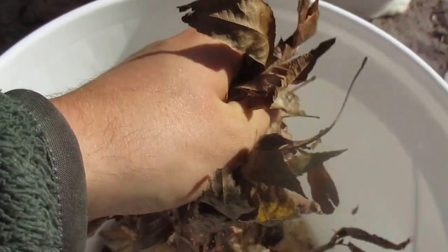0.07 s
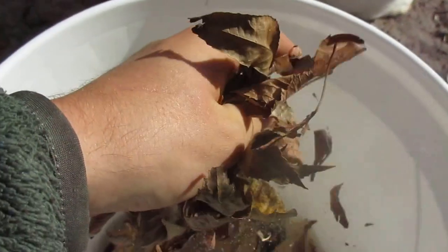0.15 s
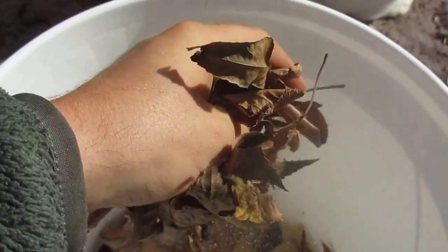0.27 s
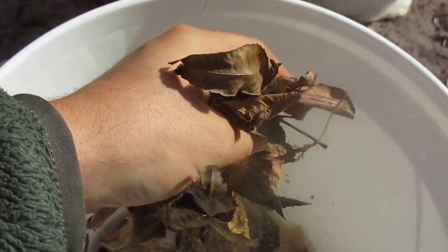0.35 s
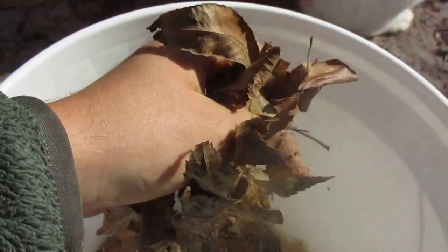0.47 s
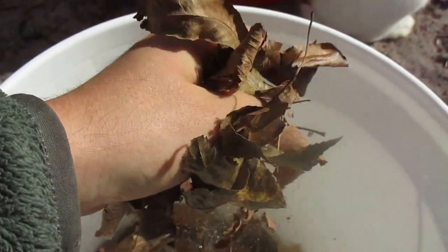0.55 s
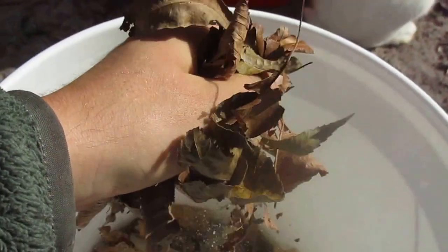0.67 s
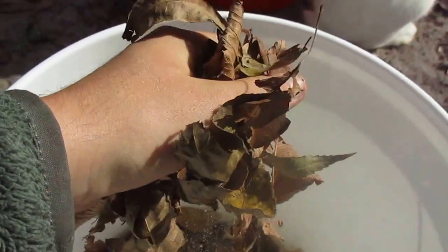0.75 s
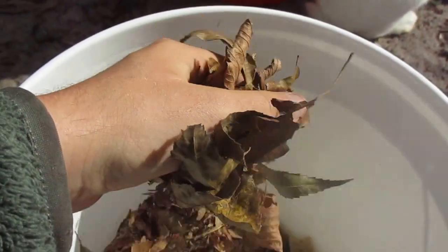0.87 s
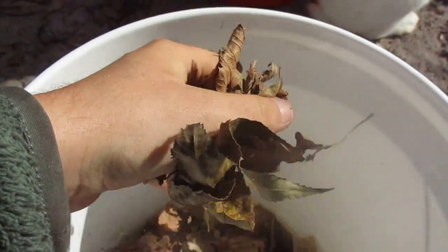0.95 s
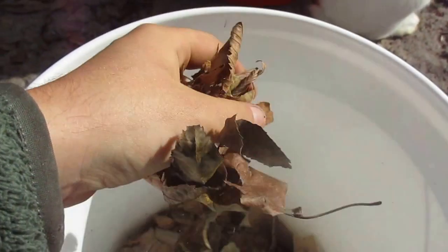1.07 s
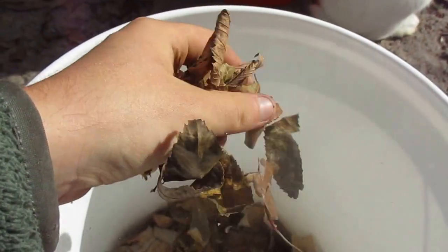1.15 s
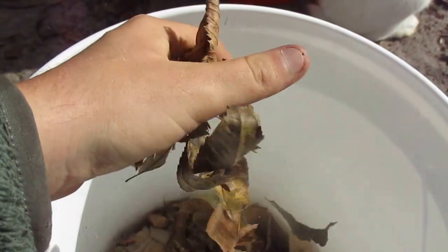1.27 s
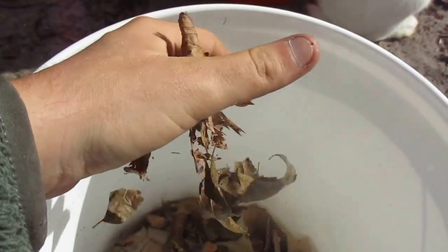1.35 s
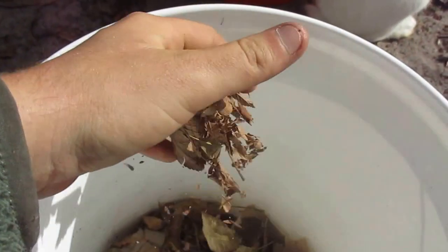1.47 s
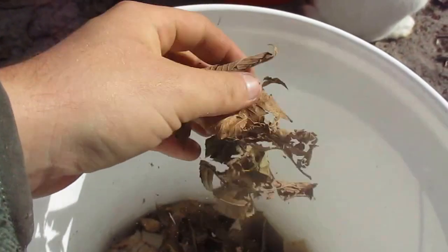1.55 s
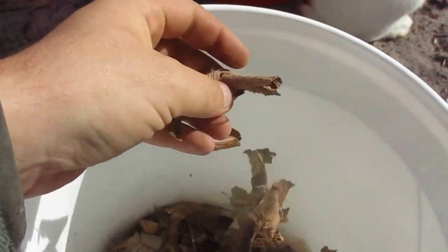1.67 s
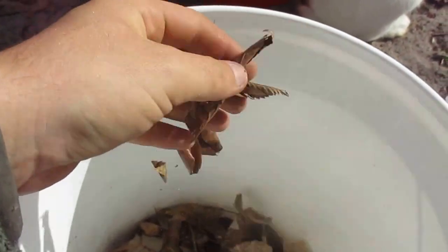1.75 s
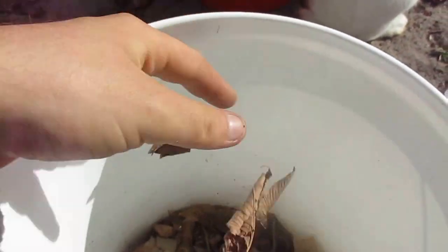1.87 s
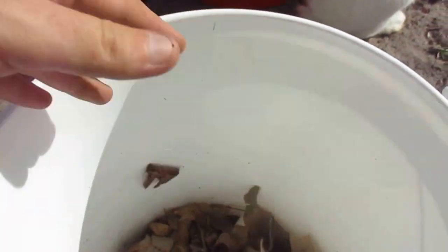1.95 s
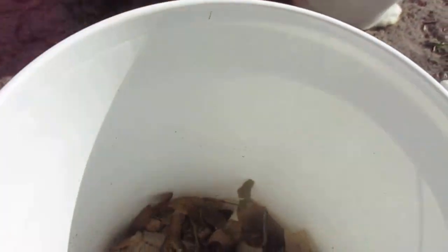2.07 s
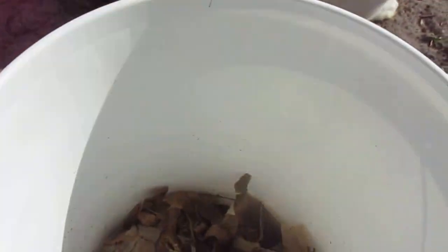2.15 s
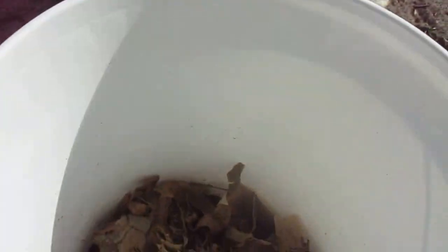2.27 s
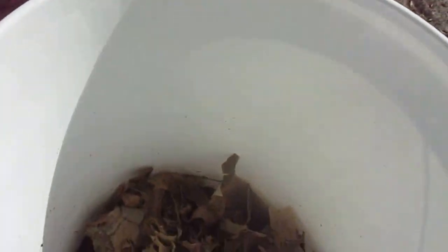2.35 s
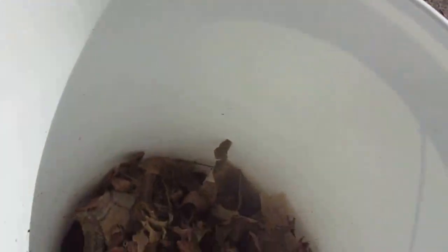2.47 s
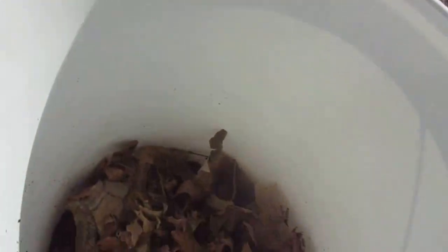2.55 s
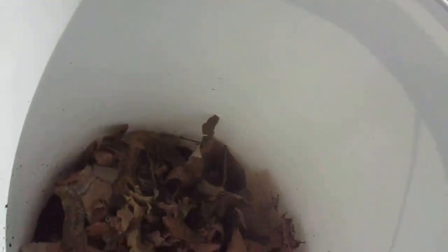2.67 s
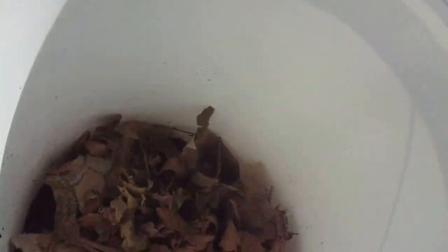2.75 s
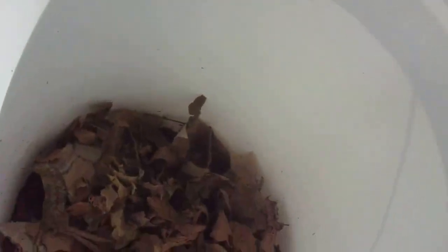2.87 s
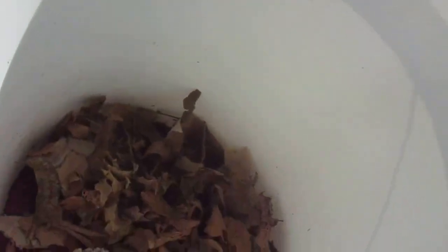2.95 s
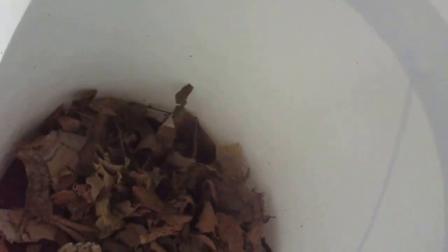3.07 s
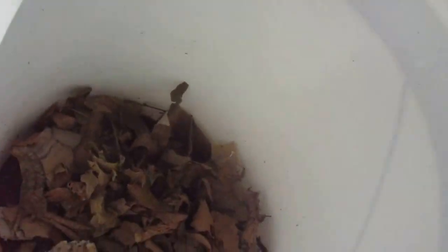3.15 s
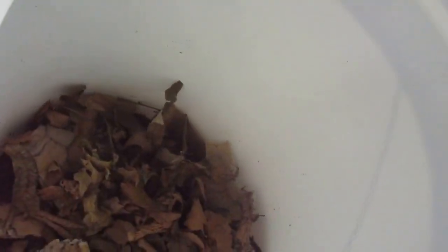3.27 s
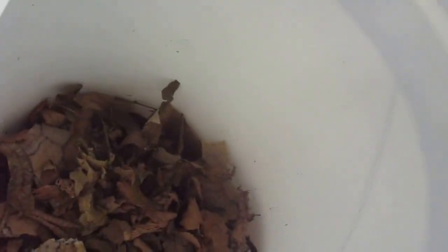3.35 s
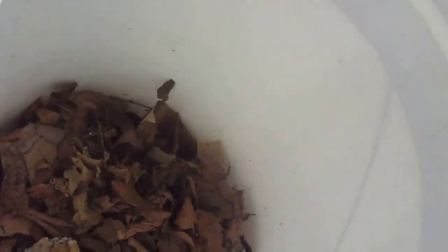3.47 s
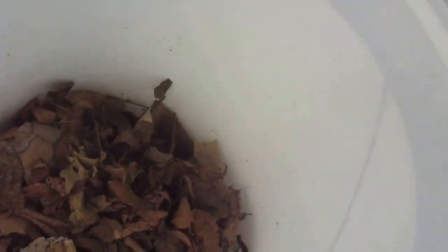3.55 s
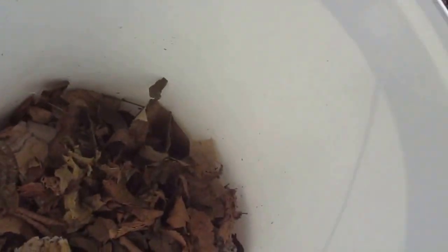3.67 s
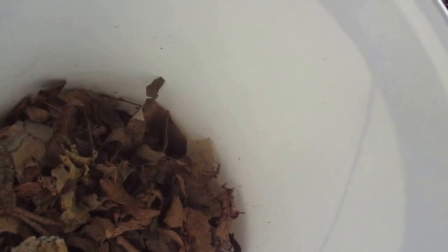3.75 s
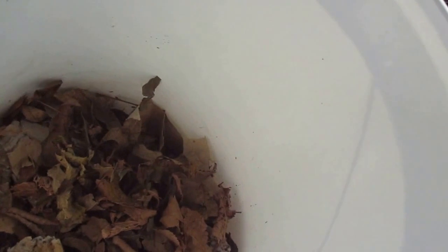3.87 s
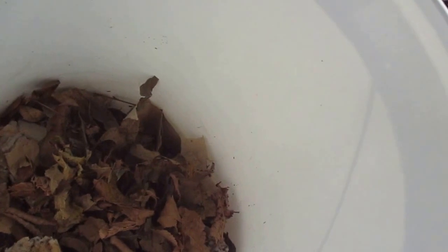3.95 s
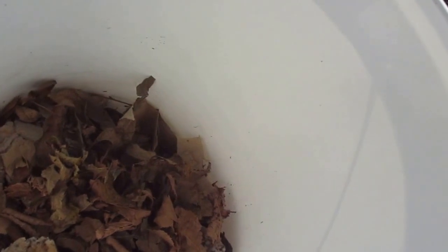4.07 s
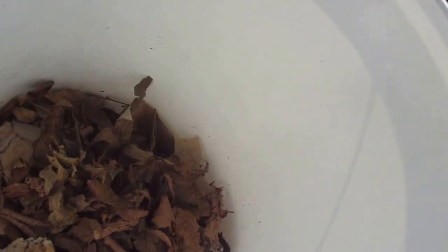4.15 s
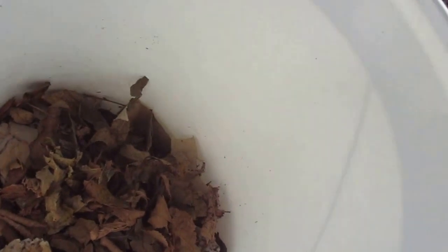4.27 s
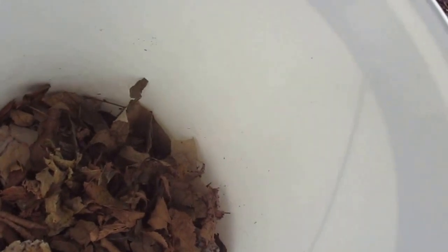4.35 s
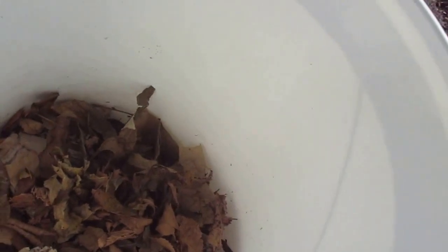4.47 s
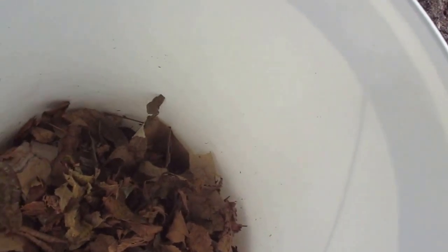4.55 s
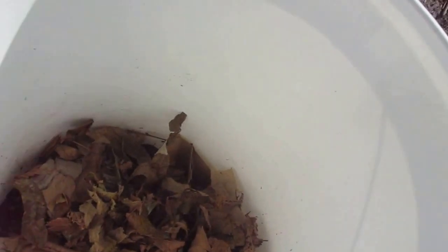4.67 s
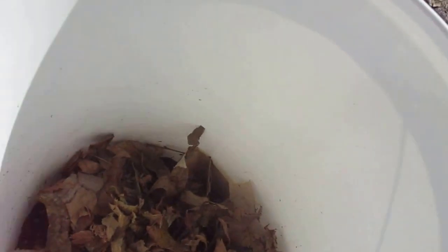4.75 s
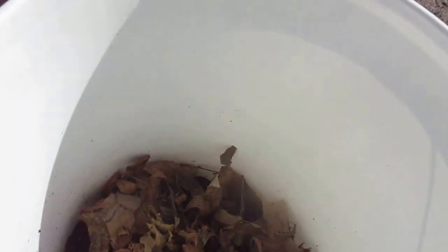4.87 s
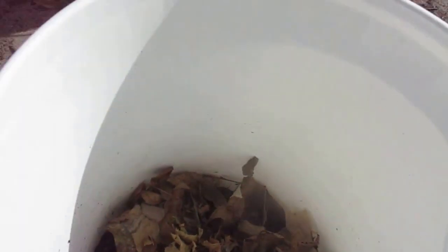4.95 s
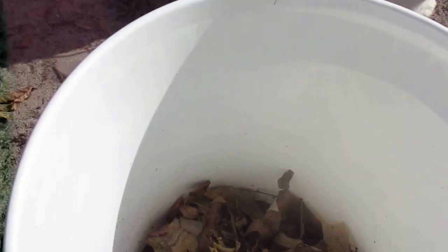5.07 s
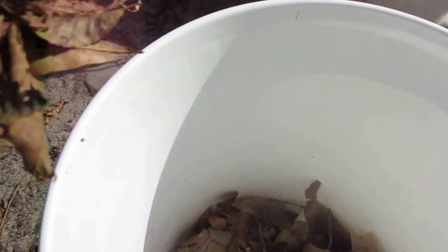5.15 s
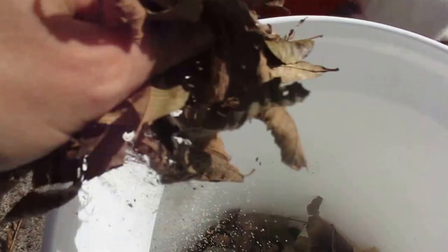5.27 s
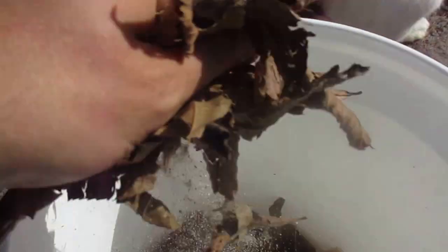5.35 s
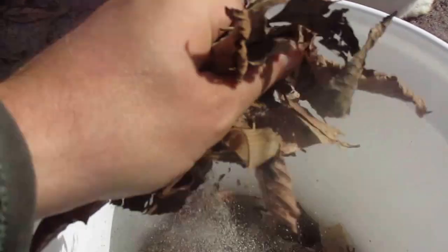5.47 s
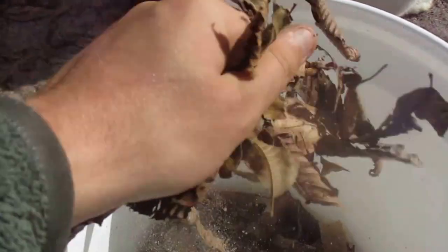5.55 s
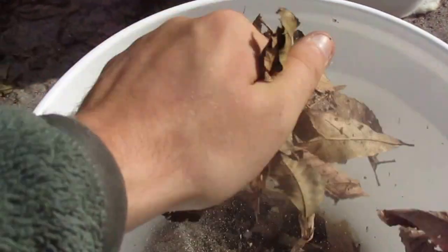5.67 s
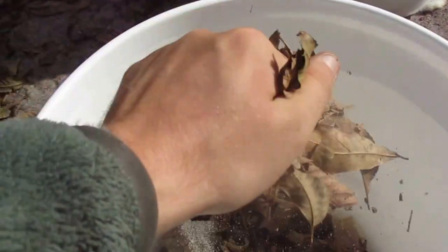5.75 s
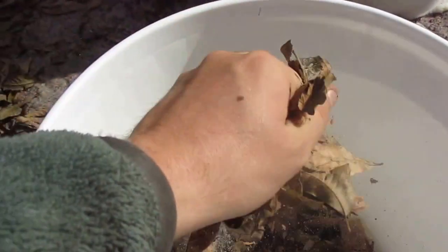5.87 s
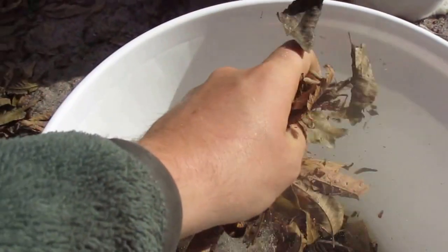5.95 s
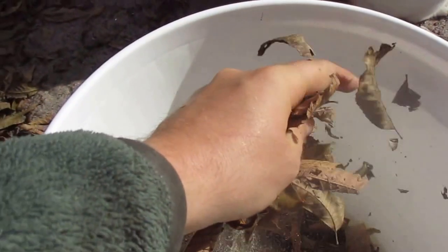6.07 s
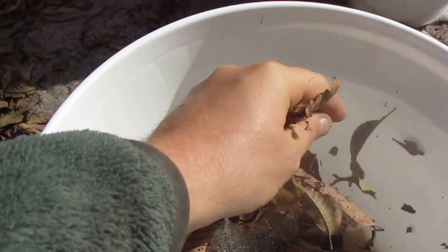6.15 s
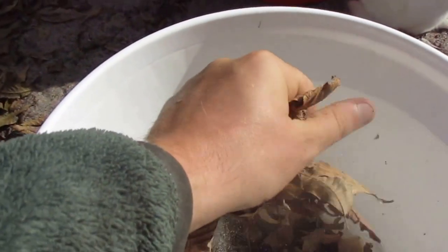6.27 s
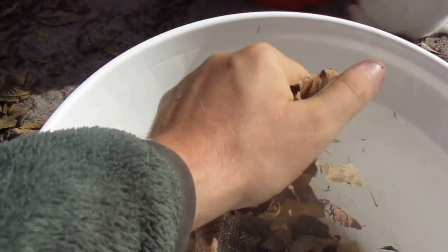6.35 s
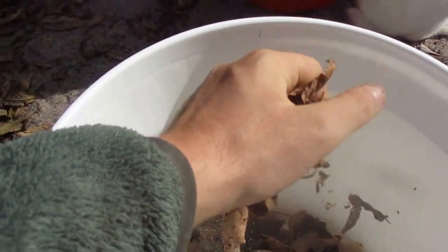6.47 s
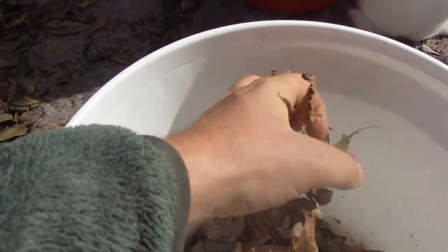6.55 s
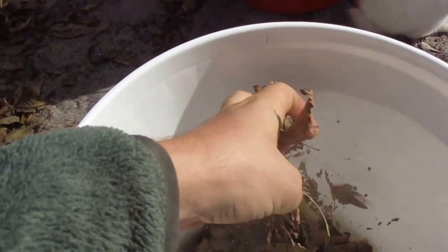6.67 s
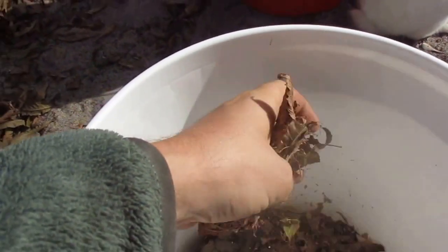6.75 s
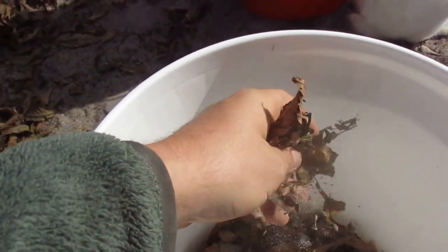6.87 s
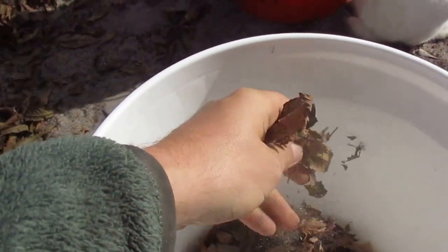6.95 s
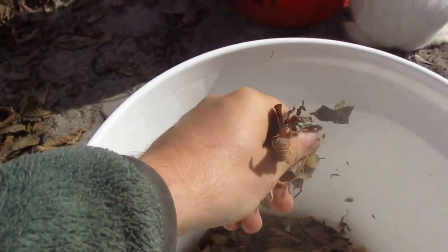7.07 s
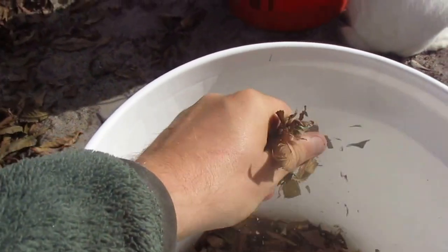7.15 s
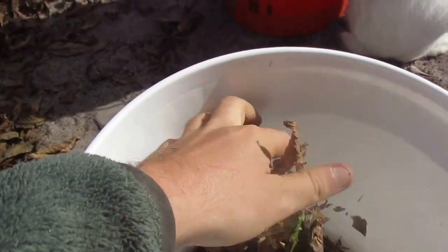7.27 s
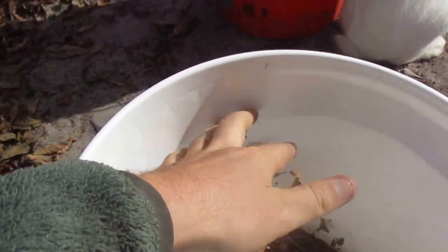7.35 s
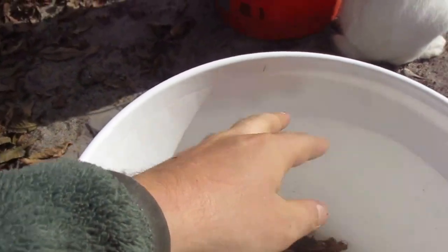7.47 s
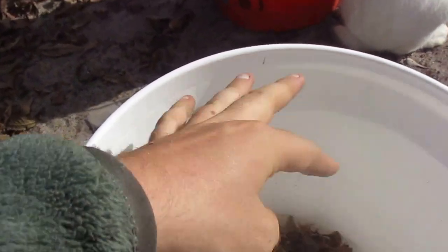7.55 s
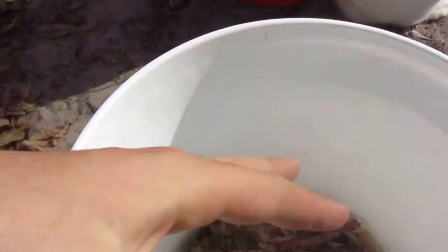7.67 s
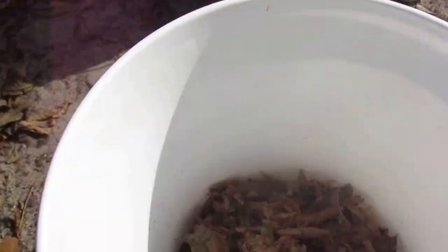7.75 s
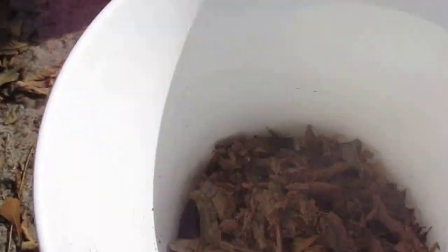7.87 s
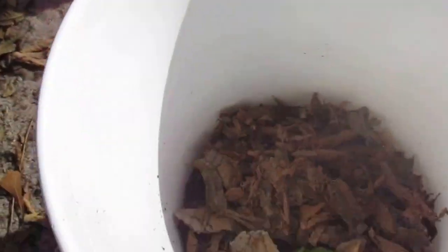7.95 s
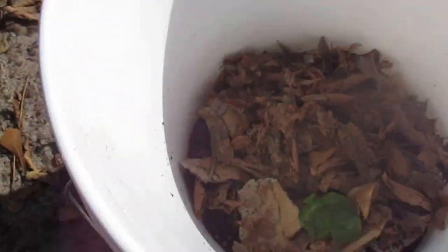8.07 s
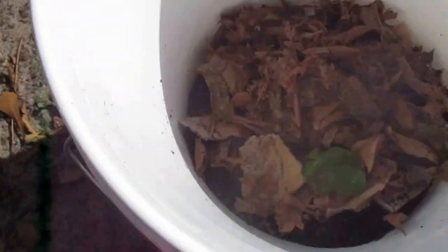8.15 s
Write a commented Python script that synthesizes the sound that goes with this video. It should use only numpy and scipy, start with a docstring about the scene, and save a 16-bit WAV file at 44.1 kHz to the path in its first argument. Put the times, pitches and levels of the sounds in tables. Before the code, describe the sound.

Close outdoor pickup. From the start a hand crunches dry leaves over a plastic bucket: crisp, bright crackling, strongest at once and around 1 s, with tiny snaps and a faint hollow bucket tone. From 1.3 to 2.1 s it breaks into sparse crunches, ticks and light knocks. Near quiet follows, with only soft rustle, low outdoor rumble and hollow murmur. From about 2.8 s leaves are raked in swelling, duller sweeps, loud near 3.3 s, lighter around 3.6, then rasping and snapping from 3.9 to 5 s, with a woody crack and soft bump near 4.8. At 5.2 to 5.6 s comes the densest, loudest crushing. Separate crunches continue to 7.5 s, thinning out, with small cracks and a prominent hollow knock at 7.3. A soft, low sleeve-like rustle and slight wind rumble end it by 8.1 s.

```python
"""A hand crunches a fistful of dry leaves over a plastic bucket outdoors, as filtered bursts of tiny fractures.
Clumps land in it, more leaves are raked from the ground in swelling, duller sweeps and crunched in their turn,
and it ends on a soft, low rustle of sleeve or handling. Ribs snap as short ringing ticks and surfaces rasp in
uneven slips; random echoes place grains in the bucket. Knocks, woody cracks and soft bumps ring a bank of modes.
Throughout, filtered noise makes outdoor rumble, a hollow murmur in the bucket and puffs of wind on the microphone."""
import sys
import numpy as np
from scipy import signal
from scipy.fft import rfft, irfft
from scipy.io import wavfile
from scipy.ndimage import uniform_filter1d

SR = 44100
rng = np.random.default_rng(int(sys.argv[2]) if len(sys.argv) > 2 else 0)


def to_wav(s):
    """Save 16-bit WAV."""
    ch = np.atleast_2d(s).T  # columns
    pcm = np.round(np.clip(ch, -1, 1) * 32767)  # PCM
    wavfile.write(sys.argv[1], SR, pcm.astype(np.int16))


N = 361566
TIME = np.arange(N) / SR

# sweeps through ground leaves, and faint rustles of clothing or handling at the end: start_s [s], length_s [s],
# crackle level_db at the end [dB], dull_db of the rustle against the crackle before its trim [dB],
# swell_db from start to end [dB]
SWEEPS_AND_RUSTLES = [(2.187, 0.42, -61, 8, 6), (2.745, 0.13, -46, 4.5, 6.5), (2.82, .23, -35.5, 0, 5.5),
                      (3.04, 0.29, -24, -2, 18.5), (3.393, .16, -34, -6, 13), (3.573, 0.061, -35.5, -4, 8),
                      (3.653, 0.12, -46.5, -6, -0.5), (3.852, 0.078, -30, -1.5, 11.5),
                      (3.906, 0.25, -24.5, -4.5, 6), (4.138, 0.2, -31.5, -2, -1.5),
                      (4.307, 0.22, -22.5, -4, 2.5), (4.534, .17, -27, -7, -4.5),
                      (4.723, 0.054, -25, -14, -5), (4.8, 0.17, -28.5, -8.5, 1), (4.96, 0.224, -28, -17, 2),
                      (7.613, 0.6, -58, 8, -5.5), (8.044, 0.044, -51, 12.5, -5)]
CATCH_S = 0.032  # time each of them takes to fade in


def from_db(db):
    """Turns decibels into an amplitude factor."""
    return 10 ** (np.asarray(db) / 20)


def unit(x):
    """Scales to rms 1."""
    return x / np.sqrt(np.mean(x ** 2) + 1e-20)


def level(rows, column):
    """Gain over time, drawn between the points of one dB column."""
    rows = np.asarray(rows)
    return from_db(np.interp(TIME, rows[:, 0], rows[:, column]))


def add(mix, start_s, sound):
    """Mixes a sound in from its start time, trimming whatever falls outside."""
    start = round(start_s * SR)
    sound = sound[max(-start, 0):]
    part = mix[max(start, 0):][:len(sound)]
    part += sound[:len(part)]


def colour(x, points, peaks=(), size=4096):
    """Minimum-phase filter with a given spectrum and resonances, so that clicks keep sharp fronts."""
    hz = abs(np.fft.fftfreq(size, 1 / SR))
    point_hz, point_db = np.transpose(points)
    db = np.interp(np.log(hz + 1), np.log(point_hz), point_db)
    for peak_hz, width_hz, lift_db in peaks:
        db = db + lift_db / (1 + (2 * (hz - peak_hz) / width_hz) ** 2)
    # the Hilbert transform of the log spectrum supplies the phase
    log_spectrum = np.conj(signal.hilbert(np.log(from_db(db))))
    impulse = np.fft.ifft(np.exp(log_spectrum)).real
    return signal.oaconvolve(x, impulse)[:len(x)]


def wander(rate_hz):
    """Smooth chance of rms 1: noise that falls away above the given rate."""
    hz = np.fft.rfftfreq(N, 1 / SR)
    spectrum = rfft(rng.standard_normal(N)) / np.sqrt(1 + (hz / rate_hz) ** 4)
    return unit(irfft(spectrum, N))


def steadied(x, span_s):
    """Divides out the running rms, so that a sound's strength is set from outside."""
    power = abs(uniform_filter1d(x ** 2, int(span_s * SR) + 1))
    return x / np.sqrt(power + 1e-9)


def strength(dull=False):
    """Strength over time of the crisp crackle, or of the dull rustle: all the gestures add in power."""
    # the fist crunches leaves over the bucket, and clumps of leaves land in it: start_s [s], hold_s [s],
    # crackle level_db at full onset [dB], dull_db of the rustle against the crackle before its trim [dB]
    crunches = [(-.02, .07, -27, -10), (0.088, 0.05, -32.5, -9), (0.178, 0.12, -31, -11),
                (0.336, 0.39, -37, -10), (0.531, 0.12, -34.5, -9.5), (0.725, 0.34, -37.5, -12),
                (0.986, 0.04, -26.5, -9.5), (1.065, 0.19, -32, -13.5), (1.336, 0.1, -39, -12.5),
                (1.503, 0.016, -35.5, -8.5), (1.543, 0.016, -28, -11), (1.61, 0.12, -42, -13),
                (1.743, 0.06, -30.5, -7.5), (1.86, 0.14, -49.5, -1), (1.984, 0.036, -34.5, -2.5),
                (2.127, 0.014, -47, 0), (5.187, 0.11, -23.5, -17), (5.293, 0.077, -20.5, -15),
                (5.408, 0.14, -23, -14.5), (5.498, 0.14, -23, -16), (5.686, .1, -35, -22),
                (5.778, 0.14, -29, -10), (5.879, 0.54, -27.5, -18), (6.147, 0.21, -26, -11),
                (6.409, 0.082, -35.5, -19), (6.48, 0.024, -26.5, -8), (6.577, 0.042, -36, -4),
                (6.646, 0.064, -28, -11.5), (6.742, 0.079, -26.5, -8), (6.85, 0.24, -31, -12.5),
                (7.014, 0.028, -26, -11.5), (7.126, 0.079, -31.5, -11), (7.266, 0.027, -40.5, -17),
                (7.365, 0.086, -27.5, -7), (7.494, 0.14, -42, -6)]
    # each starts quickly, eases off, then lets go
    grip_s, ease_db_per_s, let_go_db_per_s = 0.017, 10.5, 189
    settle_db_per_s = 297  # how fast a sweep or rustle dies after its end
    t = TIME[::64]
    power = np.full(len(t), 1e-9)
    for start_s, hold_s, db, dull_db in crunches:
        held_s = t - start_s - grip_s
        ease_db = ease_db_per_s * np.clip(held_s, 0, hold_s)
        release_db = let_go_db_per_s * np.maximum(held_s - hold_s, 0)
        attack = np.clip((t - start_s) / grip_s, 0, 1)
        power += (attack * from_db(db + dull * dull_db - ease_db - release_db)) ** 2
    for start_s, length_s, db, dull_db, swell_db in SWEEPS_AND_RUSTLES:
        passed_s = t - start_s
        # a positive swell rises to the end level, a negative one falls to it
        below_end_db = swell_db * np.clip(1 - passed_s / length_s, 0, 1)
        release_db = settle_db_per_s * np.maximum(passed_s - length_s, 0)
        attack = np.clip(passed_s / CATCH_S, 0, 1)
        power += (attack * from_db(db + dull * dull_db - below_end_db - release_db)) ** 2
    return np.interp(TIME, t, np.sqrt(power))


def outside_bucket():
    """Share of the drier colour outside the bucket, 0-1: it rises around each ground sweep or closing rustle."""
    outside = np.zeros(N)
    for start_s, length_s, *_ in SWEEPS_AND_RUSTLES:
        outside[(TIME > start_s - CATCH_S) & (TIME < start_s + length_s + CATCH_S)] = 1
    return uniform_filter1d(outside, size=2048)


def walls(sound, wet_db=-8, t60=.045):
    """Quick echoes between the bucket's walls, as decaying random taps drawn afresh for each call."""
    t = np.arange(1536) / SR
    signs = rng.choice([-1, 1], len(t))
    present = (rng.random(len(t)) < .2) * (t > .0008)
    echoes = signs * present * from_db(-60 * t / t60)
    return signal.fftconvolve(sound, (t == 0) + from_db(wet_db) * echoes / np.linalg.norm(echoes))


def fractures(per_s, spread_db, clump_db, low_hz, high_hz, cycles, shift_db, count=40):
    """Clumps of tiny breaks; each rings one scrap of leaf briefly, and the scraps take turns."""
    size = from_db(spread_db * np.minimum(rng.exponential(1, N), 3.2))
    breaking = rng.random(N) < per_s / SR
    clicks = size * rng.choice([-1, 1], N) * breaking * from_db(clump_db * wander(100))
    scrap = rng.integers(0, count, N)
    t, out = np.arange(256) / SR, np.zeros(N)
    turns = np.arange(0, TIME[-1], .02)
    for k, hz in enumerate(np.linspace(low_hz, high_hz, count)):
        ring = walls(np.exp(-t * hz / cycles) * np.cos(2 * np.pi * hz * t))
        strain_db = shift_db * np.interp(TIME, turns, rng.standard_normal(len(turns)))
        out += signal.oaconvolve(clicks * (scrap == k) * from_db(strain_db), unit(ring))[:N]
    return unit(out)


def crackle(shade_hz=11500):
    """Brittle blades break over a fine hiss of rubbing; outside the bucket they sound duller."""
    # crisp spectrum: pitch_hz [Hz], relative level_db [dB per Hz]
    crisp = [(200, -22.5), (700, -13), (1800, -12), (2700, -8), (3600, -5), (4900, -1), (6500, -1),
             (8500, -1), (11000, -2.5), (14000, -6), (16000, -11.5)]
    # more strength breaks more at once, so loud crunches are dense and quiet ones patter
    per_s = 5200 * np.sqrt(strength() / from_db(-30))
    breaks = fractures(per_s, spread_db=4.5, clump_db=2.5, low_hz=1500, high_hz=15500, cycles=2.2, shift_db=2.5)
    rubbing = from_db(-10) * rng.standard_normal(N)
    near = unit(colour(steadied(breaks, 0.204) + rubbing, crisp))
    shaded = signal.filtfilt(*signal.butter(1, shade_hz, fs=SR), near)
    sound = near + .5 * outside_bucket() * (shaded - near)
    return strength() * steadied(sound, 0.033)


def rustle():
    """Soft brushes and ticks: hollow in the bucket, broader and drier outside it."""
    # spectra in and outside the bucket: pitch_hz [Hz], relative level_db [dB per Hz]
    dull_spectrum = [(60, -50), (200, 14), (500, -4.5), (700, 12), (1100, 3.5), (1400, 0.5), (2100, 0.5),
                     (2800, -4.5), (4200, 4.5), (9000, -45)]
    dry_spectrum = [(60, -21), (200, 2), (450, -2.5), (700, -4.5), (1000, -2.5), (1300, 1), (1700, -2.5),
                    (2050, -0.5), (2800, -1), (4200, -5), (9000, -18)]
    # air resonances in the bucket: pitch_hz [Hz], width_hz [Hz], lift_db [dB]
    cavity = [(664, 58, -6), (890, 600, -2.5), (1250, 120, 1), (1494, 77, 5.5), (2080, 200, 1.5)]
    brushes = fractures(per_s=1500, spread_db=3.5, clump_db=0.5, low_hz=406, high_hz=4650, cycles=0.5, shift_db=-2.0)
    ticks = fractures(per_s=500, spread_db=4.5, clump_db=2, low_hz=600, high_hz=3200, cycles=6, shift_db=2)
    grains = brushes + .6 * ticks
    inside = unit(colour(grains, dull_spectrum, cavity))
    outside = unit(colour(grains, dry_spectrum))
    share = outside_bucket()
    sound = (1 - share) * inside + share * outside
    return strength(dull=True) * from_db(-2.5) * steadied(sound, 0.077)


def ribs():
    """Chance snaps that follow the crackle's strength: start_s, level_db before the snap trim, pitch_hz."""
    per_s, over_crackle_db, spread_db = 16, 5, 0.5
    middle_hz, spread_octaves = 7500, 0.594
    at = np.flatnonzero(rng.random(N) < per_s / SR)
    size, pitch = rng.standard_normal((2, N))[:, at]
    db = 20 * np.log10(strength()[at]) + over_crackle_db + spread_db * np.minimum(size, 2)
    hz = np.minimum(middle_hz * 2 ** (spread_octaves * pitch), SR / 4)
    return list(zip(TIME[at], db, hz))


def snaps(splinter_db=-6, splinter_cycles=6, tear_db=-6):
    """A rib tears with a sharp tick, rings for about two cycles and sheds splinters, longer at low pitch."""
    # the placed stems and ribs: start_s [s], level_db as energy over 1 ms before trim and echoes [dB], pitch_hz [Hz]
    large_snaps = [(0.214, -25.5, 2800), (0.2706, -19, 5800), (0.6543, -22, 4700), (0.7807, -21, 7500),
                   (0.8717, -22.5, 9000), (1.1092, -18.5, 6800), (1.1485, -23, 5350), (1.403, -24, 6400),
                   (1.4206, -24, 3040), (1.5214, -33, 6100), (1.5323, -21, 10300), (1.5715, -12.5, 7650),
                   (1.682, -21.5, 11000), (1.7594, -18.5, 6000), (1.7763, -17, 6300), (1.8215, -21, 11000),
                   (1.8509, -24, 3970), (1.9713, -19.5, 6500), (2.006, -19.5, 6000), (2.0608, -23, 8400),
                   (2.8892, -25, 1780), (3.2724, -15, 7100), (3.3297, -11, 5900), (3.3506, -8, 7500),
                   (4.1806, -9.5, 5940), (4.3495, -10.5, 7800), (4.515, -16, 3760), (4.6995, -12, 3300),
                   (4.7508, -11.5, 5800), (4.755, -20, 3670), (4.7748, -16, 3700), (4.7832, -14, 2180),
                   (4.8205, -15.5, 2370), (4.85, -21, 2300), (4.8896, -12.5, 5800), (4.898, -14, 3000),
                   (4.9084, -26, 2800), (4.914, -18, 2400), (4.9208, -13, 4400), (4.9577, -20.5, 2800),
                   (5.1462, -18, 6900), (5.19, -9.5, 4440), (5.211, -15, 4700), (5.272, -12.5, 3950),
                   (5.3312, -17, 6600), (5.3661, -11, 4770), (5.37, -9.5, 6040), (5.4026, -12.5, 8000),
                   (5.4736, -10.5, 3930), (6.363, -14.5, 6500), (6.4972, -18.5, 4300),
                   (6.6234, -20.5, 5200), (6.677, -16, 7800), (6.7494, -17, 7000), (7.037, -26, 7100),
                   (7.381, -27, 6000), (7.4525, -13.5, 6550), (7.8877, -30, 4870), (8.053, -27, 3320)]
    out, t, millisecond = np.zeros(N), np.arange(512) / SR, SR // 1000
    thin = signal.butter(2, [1300, 14500], "band", fs=SR)
    tear = unit(np.diff(1. * (t == 0), prepend=0))
    for start_s, db, hz in large_snaps + ribs():
        ring = np.exp(-t * hz / 2) * np.cos(2 * np.pi * hz * t)
        band = signal.butter(1, [hz / 2, min(hz * 2, SR / 3)], "band", fs=SR)
        spray = signal.lfilter(*band, np.exp(-t * hz / splinter_cycles) * rng.standard_normal(len(t)))
        snap = unit(ring) + from_db(splinter_db) * unit(spray) + from_db(tear_db) * tear
        snap = signal.lfilter(*thin, snap)  # a leaf is too small to radiate bass
        snap *= from_db(db - 1) * np.sqrt(millisecond / np.sum(snap ** 2))  # 1 dB trim
        add(out, start_s, walls(snap, wet_db=-11, t60=.03))
    return out


def scrapes(slips_per_s=900, cycles=0.95):
    """Surfaces drag: uneven slips ring one resonance, high for stiff leaf, low for a rubbing hand or sleeve."""
    # drags: start_s [s], level_db at the middle [dB rms], pitch_hz [Hz], length_s [s]
    drags = [(0.058, -30, 5000, 0.033), (0.085, -29, 4930, 0.053), (0.059, -51, 229, 0.15),
             (0.156, -51, 225, 0.21), (2.846, -46, 2320, 0.066), (3.897, -28, 5300, 0.29),
             (4.115, -32, 1340, .03), (4.47, -31.5, 1250, 0.068), (4.886, -26, 2200, 0.048),
             (5.187, -19.5, 2970, 0.0093), (5.208, -31, 3830, 0.29), (5.43, -39, 190, .1),
             (7.777, -44.5, 370, 0.35)]
    out, t = np.zeros(N), np.arange(20000) / SR
    for start_s, db, hz, length_s in drags:
        slips = rng.standard_normal(len(t)) * (rng.random(len(t)) < slips_per_s / SR)
        ring = t * np.exp(-t * hz / cycles) * np.sin(2 * np.pi * hz * t)
        rasp = steadied(unit(signal.fftconvolve(slips, ring)[:len(t)]), 0.033)
        swell = np.sin(np.pi * np.minimum(t / length_s, 1)) ** 2
        add(out, start_s, from_db(db) * rasp * swell)
    return out


def blows(rows, octaves, damping, scuff_db, scuff_s):
    """Each event rings the modes of the bank near its own pitch, with a brief burst of noise."""
    # bank of modes: pitch_hz [Hz], level_db [dB], t60_s before the damping factor [s]
    mode_bank = [(118, -8, .16), (180, 0, .11), (240, -1, .07), (345, -8, .07), (608, -3, .07),
                 (860, 1, .055), (1028, -4, .05), (1110, -8, .05), (1381, -1, .05), (1609, 1, .04),
                 (1830, -2, .025), (2060, -2, .02), (2275, -2, .022), (2850, -8, .018)]
    out, t = np.zeros(N), np.arange(8192) / SR
    hz, mode_db, t60 = np.transpose(mode_bank)[:, :, None]
    for start_s, db, pitch_hz in rows:
        weight = 1 / (1 + (np.log2(hz / pitch_hz) / octaves) ** 4)
        decay = from_db(mode_db - 60 * damping * t / t60)
        modes = weight * decay * np.sin(2 * np.pi * hz * t) * rng.choice([-1, 1], hz.shape)
        ring = modes.sum(0)
        band = signal.butter(2, [pitch_hz / 2, pitch_hz * 2], "band", fs=SR, output="sos")
        scuff = unit(signal.sosfilt(band, rng.standard_normal(len(t)))) * np.exp(-t / scuff_s)
        add(out, start_s, from_db(db) * (ring / abs(ring).max() + from_db(scuff_db) * scuff))
    return out


def knocks_and_cracks():
    """Hard, short events excite a group of mostly high modes with a sharp scuff."""
    # knocks on the bucket wall, and woody cracks of twigs and leaf ribs while the hand rakes:
    # start_s [s], level_db of the ring's peak [dB], pitch_hz at the centre of the ringing modes [Hz]
    hard_events = [(1.421, -33, 900), (1.849, -31, 800), (1.897, -29, 1640), (1.932, -40, 930),
                   (4.133, -41, 1300), (4.204, -23, 1900), (4.672, -44, 950), (4.755, -12, 2260),
                   (4.783, -23, 1890), (4.820, -31, 2080), (4.898, -25, 2220), (4.913, -41, 2020),
                   (4.956, -21.5, 2040), (5.146, -27, 1310), (6.352, -31, 1440), (6.373, -19, 1610),
                   (6.730, -24.5, 1210), (7.234, -19.5, 1670), (7.3012, -11, 2000), (7.3022, -17, 1000),
                   (7.313, -31, 3000)]
    return blows(hard_events, octaves=0.43, damping=1.16, scuff_db=-3, scuff_s=0.0011)


def hand_bumps():
    """The soft hand bumps the bucket, exciting mostly low modes with a faint, longer scuff."""
    # bumps: start_s [s], level_db of the ring's peak [dB], pitch_hz at the centre of the ringing modes [Hz]
    bumps = [(1.083, -39, 120), (4.843, -27, 297), (4.848, -24, 98), (5.384, -33, 231), (5.447, -28, 230),
             (5.488, -24, 190), (7.303, -26, 337), (7.3135, -20.5, 188), (7.3145, -22, 664)]
    return blows(bumps, octaves=0.54, damping=0.88, scuff_db=-19, scuff_s=0.025)


def air():
    """Outdoor rumble, its hollow murmur in the bucket, and a few puffs of wind, all shaped noise."""
    # levels before flutter: time_s [s], rumble_db [dB rms], murmur_db [dB rms]
    air_levels = [(0, -62, -61.5), (.9, -62, -53.5), (1.3, -59, -47.5), (1.7, -53, -59), (2.1, -53, -51),
                  (2.6, -50, -51.5), (3.1, -48, -56), (3.8, -52.5, -55.5), (4.5, -49.5, -53),
                  (5.1, -47.5, -61), (5.5, -60, -42), (6.1, -62, -46.5), (6.7, -54, -57),
                  (7.55, -49.5, -48), (7.95, -45.5, -42.5), (8.2, -48, -45)]
    # wind on the microphone: centre_s [s], level_db at the centre [dB rms], length_s [s]
    puffs = [(1.733, -44, .04), (3.258, -49, 0.1), (3.7, -37, 0.024), (3.762, -37, 0.02), (8.08, -47, 0.11)]
    # spectra: pitch_hz [Hz], relative level_db [dB per Hz]
    rumble_spectrum = [(15, -7.5), (40, -7), (80, -4.5), (115, -3), (160, -8), (250, -20.5), (600, -31.5),
                       (3000, -38.5)]
    hollow_spectrum = [(30, -7), (90, 0.5), (160, -2), (225, 3), (285, 3), (355, 6.5), (450, 1),
                       (600, -0.5), (900, -3), (1400, -9.5), (5000, -13.5), (16000, -44)]
    puff_spectrum = [(15, 8), (45, 13), (80, -8), (140, -11), (500, -48), (2000, -80)]
    rumble = unit(colour(rng.standard_normal(N), rumble_spectrum))
    rumble *= level(air_levels, 1) * from_db(1.8 * wander(6.8))
    murmur = unit(colour(rng.standard_normal(N), hollow_spectrum))
    murmur *= level(air_levels, 2) * from_db(0.54 * wander(6.0))
    gusts = sum(from_db(db) * np.exp(-(2 * (TIME - centre_s) / length_s) ** 2) for centre_s, db, length_s in puffs)
    return rumble + murmur + gusts * unit(colour(rng.standard_normal(N), puff_spectrum))


def scene():
    """Leaves and rustles, knocks, cracks and bumps, and the air, summed at one microphone."""
    no_bass = signal.butter(2, 90, "high", fs=SR)
    grains = signal.lfilter(*no_bass, crackle() + rustle())
    leaves = grains + snaps() + scrapes()
    return (leaves + knocks_and_cracks() + hand_bumps() + air())[None]


def record(dry):
    """Clips at full scale, then cuts the treble with a steep low-pass."""
    edge = signal.firwin(601, 15950, window=("kaiser", 9), fs=SR)  # cutoff in Hz
    return signal.oaconvolve(np.clip(dry, -1, 1), edge[None], "same")


dry = scene()
out = record(dry)
to_wav(out)
```